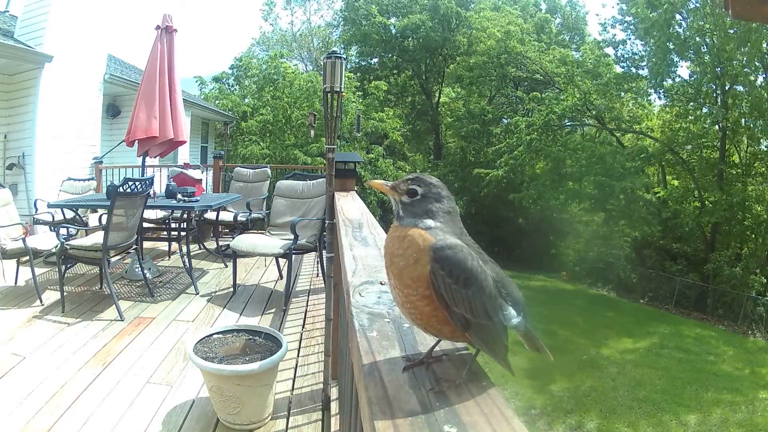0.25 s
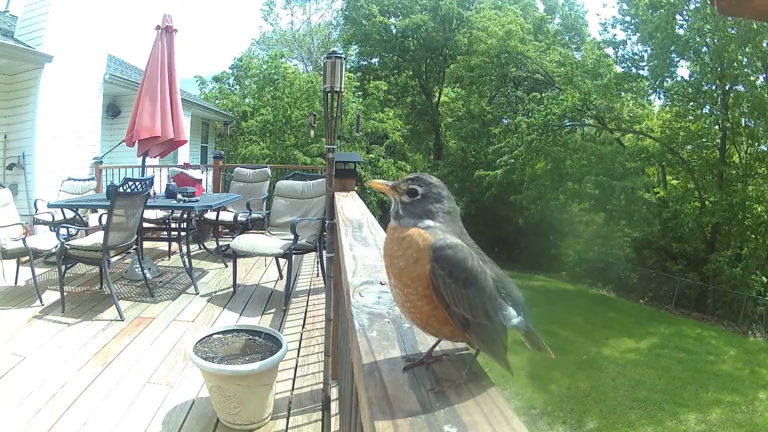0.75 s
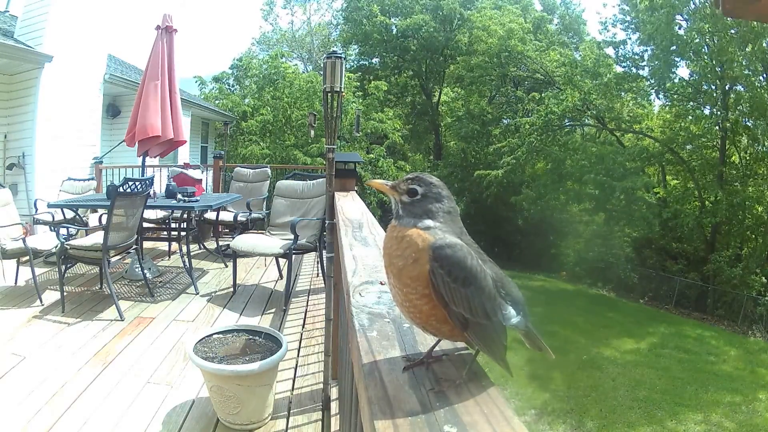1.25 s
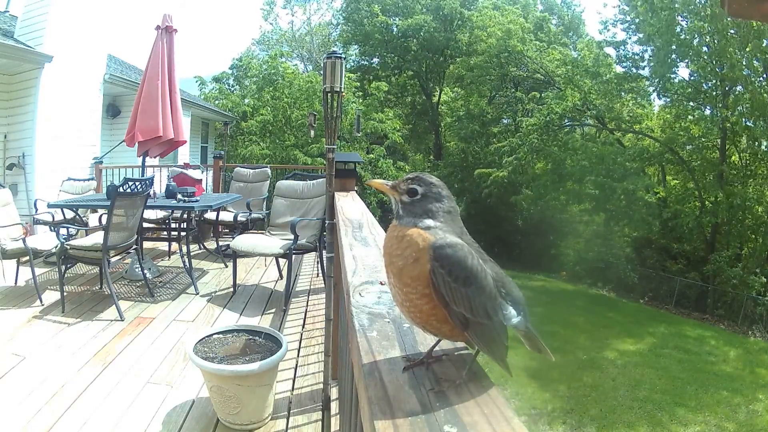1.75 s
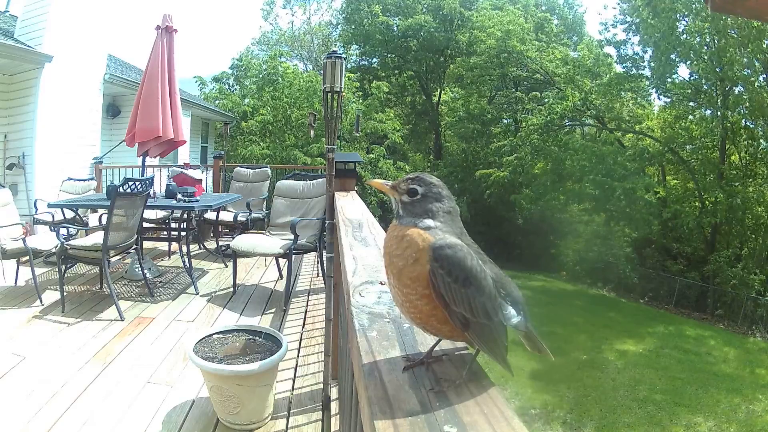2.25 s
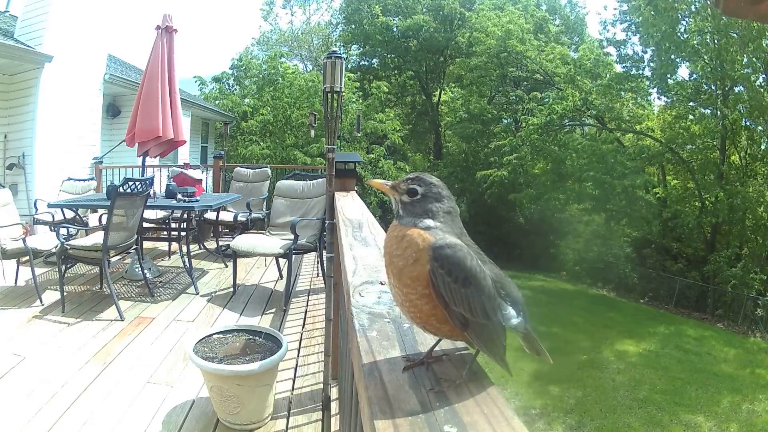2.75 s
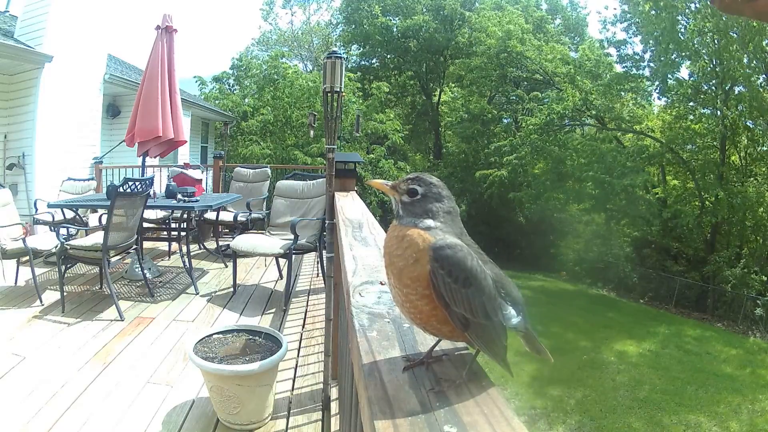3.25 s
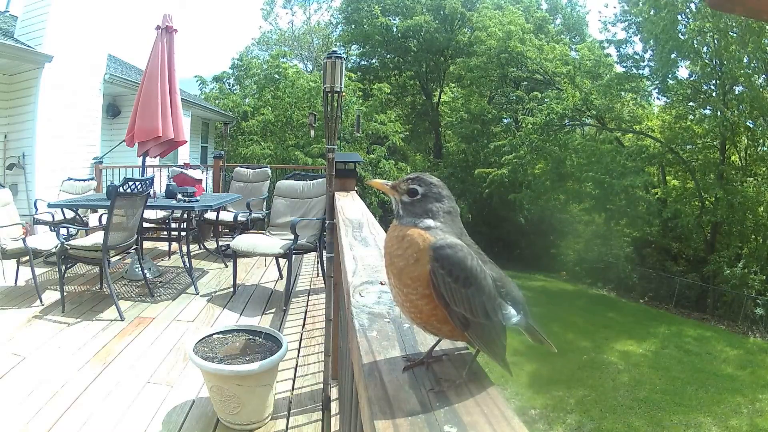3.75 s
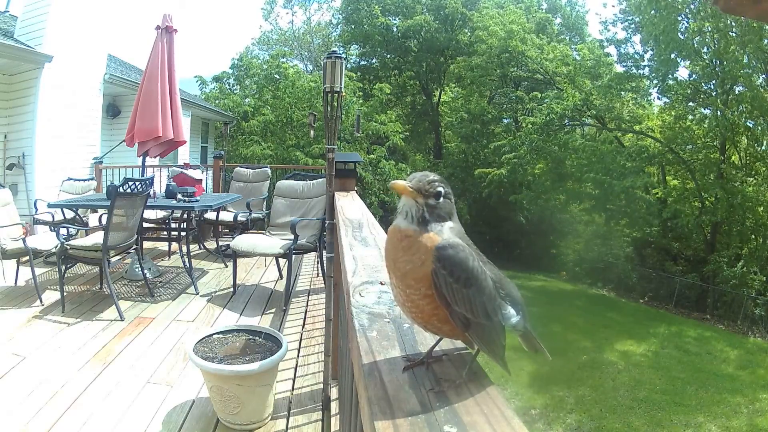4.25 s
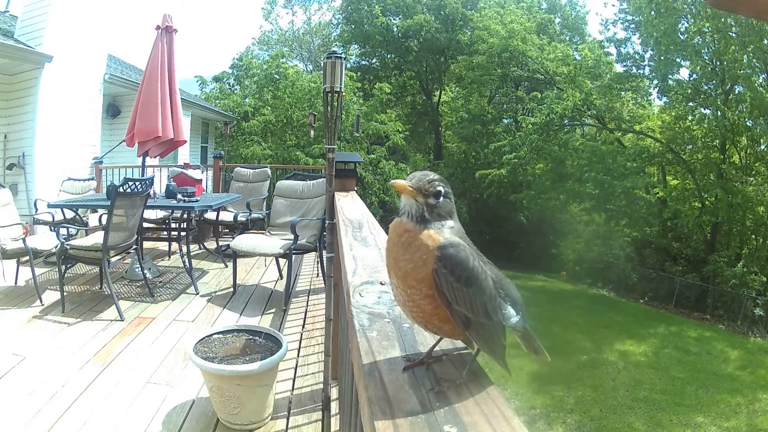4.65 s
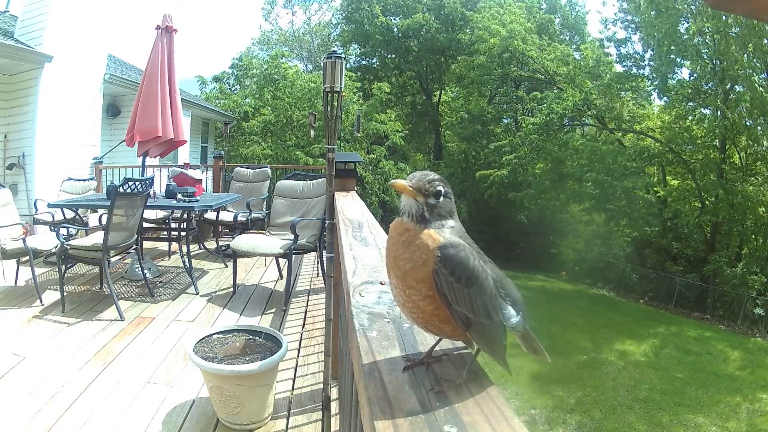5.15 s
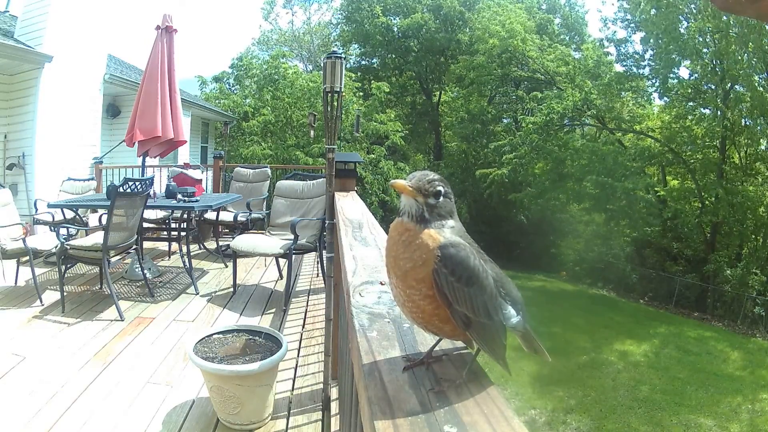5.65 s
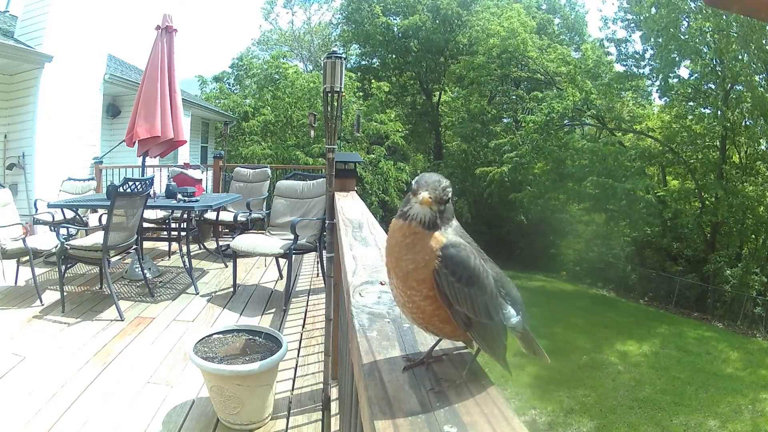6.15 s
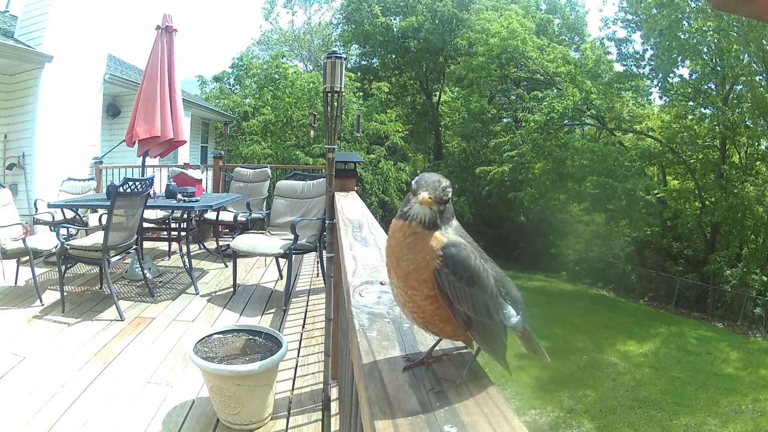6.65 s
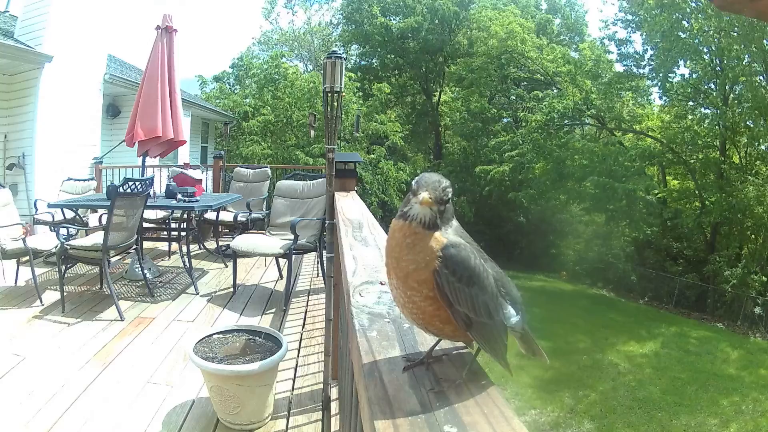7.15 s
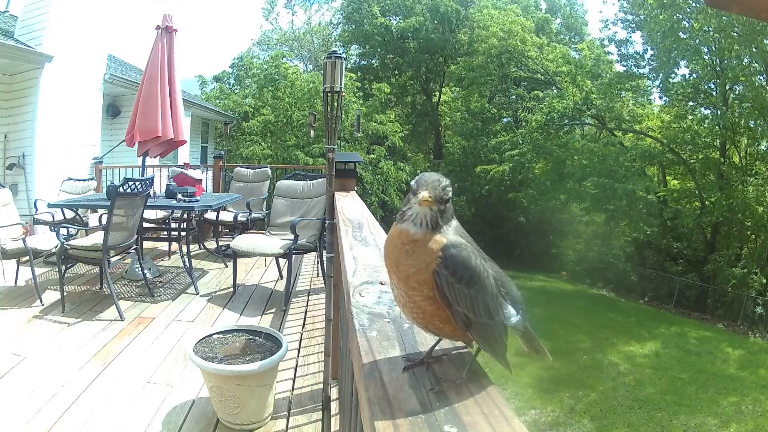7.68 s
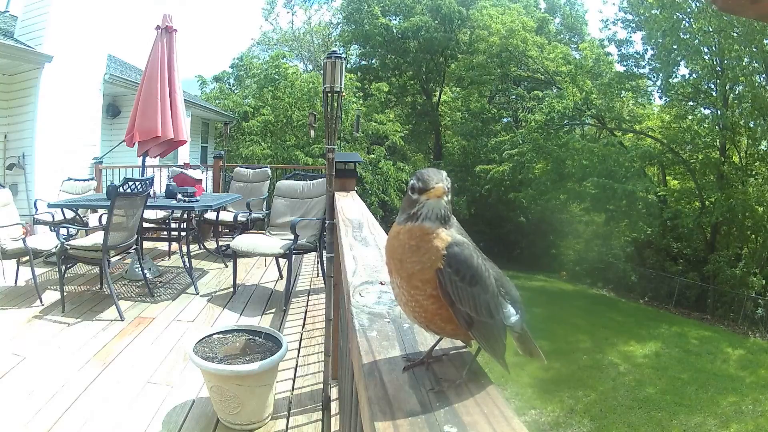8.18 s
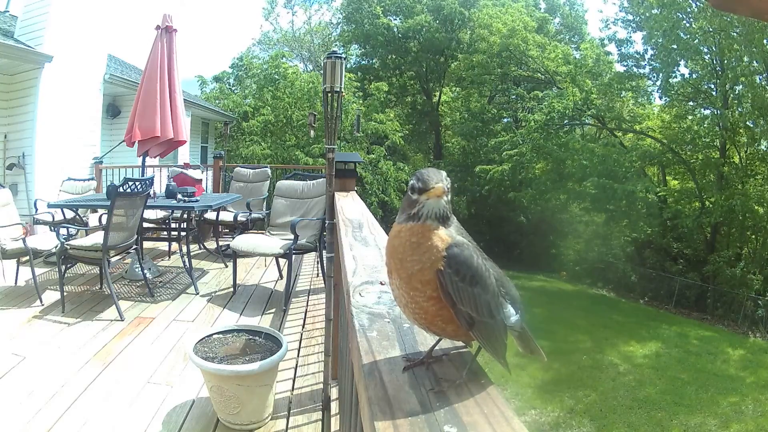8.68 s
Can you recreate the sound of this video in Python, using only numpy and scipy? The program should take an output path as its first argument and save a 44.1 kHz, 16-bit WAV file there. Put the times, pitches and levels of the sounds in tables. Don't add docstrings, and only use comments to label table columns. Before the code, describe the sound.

A quiet backyard heard through a small outdoor camera microphone, about nine seconds. A neighbouring air conditioner drones throughout: a low buzz around 250 and 500 Hz, throbbing rapidly, with soft rushing air. A robin a few metres away gives brief chirps, each about 0.05 to 0.08 seconds, sharp and slightly rough, two whistles sweeping steeply down together, with a short scatter off deck and wall. The first three come at 0.4, 0.7 and 1.0 seconds, the next, stronger, at 3.9, 4.2 and 4.4, with a very faint tail note at 4.5, and the last at 7.6, 7.8 and 8.0. Deep wind buffets thump the microphone from 0.5 to 1.7 and 2.0 to 2.9 seconds, then weaker flutters until about 5; afterwards it is calm. Far engines hum faintly at the start and intermittently after 5.4. Faint hiss and a barely audible high whine persist.

```python
import sys
import numpy as np
from scipy import signal
from scipy.fft import rfft, irfft
from scipy.io import wavfile
from scipy.ndimage import uniform_filter1d

SR = 44100
rng = np.random.default_rng(int(sys.argv[2]) if len(sys.argv) > 2 else 0)


def makeup_ratio(level_db):
    decades = np.asarray(level_db, float) / 20
    return 10 ** decades


def unload_wav(signal):
    wavfile.write(
        sys.argv[1],
        SR,
        np.round(np.clip(np.atleast_2d(signal).T, -1, 1) * 32767).astype(np.int16),
    )


N = 393372

# (start t/s, top t/s, stop t/s, top f/Hz, last f/Hz)
LOW_CALLS = [
    (.374, .385, .421, 1856, 960),
    (.681, .691, .732, 1884, 998),
    (.978, .985, 1.025, 1844, 914),
    (3.938, 3.949, 3.984, 1759, 1086),
    (4.18, 4.191, 4.232, 1855, 1087),
    (4.413, 4.421, 4.457, 2043, 1620),
    (7.57, 7.583, 7.62, 1886, 966),
    (7.831, 7.843, 7.883, 1826, 1010),
    (8.037, 8.045, 8.092, 2350, 1135),
    (4.489, 4.4895, 4.508, 1950, 1420),
]
# (start t/s, top t/s, stop t/s, top f/Hz, trough f/Hz)
HIGH_CALLS = [(.374, .387, .447, 2940, 1429), (.682, .695, .733, 3190, 1450),
              (.977, .989, 1.05, 3085, 1841), (3.938, 3.951, 4.008, 2953, 1367),
              (4.18, 4.193, 4.25, 3066, 1406), (4.41, 4.426, 4.477, 3220, 2180),
              (7.568, 7.586, 7.637, 3050, 1306), (7.83, 7.847, 7.891, 3170, 1453),
              (8.04, 8.05, 8.087, 3242, 2249)]
# (level/dB, swell level/dB, bend of the fall [exponent], even sag [share 0-1])
LOW_EFFORT = [(-38.5, 4, 2.4, .18), (-38.5, 4, 2.2, .11), (-40, 4, 5.5, .43), (-38, 3, 1.65, .1),
              (-34.8, 4, 2.7, .4), (-34.6, 8, 11, .62), (-34.2, 8, 1.9, .01), (-35.3, 7, 3.2, .22),
              (-35.3, 9, 8.5, .42), (-47.5, .1, .2, .05)]
# (level/dB, bend [exponent], sag [share 0-1], fall t/s, hook after the trough [factor])
HIGH_EFFORT = [(-40.5, 1.97, .27, .039, 1.01), (-40.5, 1.8, .25, .042, .01), (-41, 1.75, .15, .041, .01),
               (-37.5, 1.8, .17, .0435, .4), (-37.5, 1.6, .36, .048, .9), (-36.5, 4.3, .26, .051, .01),
               (-35.5, 1.5, .28, .041, .01), (-35, 2.05, .18, .04, .01), (-40.5, 4, .01, .035, .01)]
# (f/Hz, level/dB)
BEAK = [(1120, 5), (1330, 8.7), (1450, 6.2), (1560, 2.8), (1850, .1), (2200, -2.5), (2850, -6.5),
        (3200, -12)]
# (times high, times low, power of high, power of low, level/dB, flutter level/dB)
COUPLING = [
    (1, -1, .5, .5, 0, 1),
    (0, 2, 0, 1.5, -1.5, 4),
    (1, 1, 1, 1, 19, 8),
    (-1, 3, .5, .5, -13, 3),
]
# (f/Hz, level/dB)
THROAT = [(650, -20), (850, -9.5), (1050, -2.2), (1450, 0.5), (2300, -4), (2750, -16), (3300, -10.5),
          (3750, -12.5), (4150, -22), (4500, -42)]
# (order, line level/dB, one shaft turn below level/dB, one above level/dB,
# two below level/dB, two above level/dB)
BUZZ = [(1, -79, -110, -65, -110, -78), (2, -53, -60, -65, -86, -75), (3, -72, -79, -74, -75, -91),
        (4, -72, -72, -67, -87, -84), (5, -64, -72, -72, -83, -77), (6, -79, -71, -77, -92, -87),
        (7, -92, -77, -70, -76, -89), (8, -84, -88, -76, -86, -84), (9, -83, -84, -83, -91, -89),
        (10, -88, -85, -79, -89, -89), (11, -77, -80, -83, -87, -86), (12, -86, -87, -91, -87, -93),
        (13, -90, -91, -93, -101, -97), (14, -91, -94, -93, -101, -92), (15, -89, -89, -96, -94, -105),
        (16, -91, -94, -91, -95, -86), (17, -90, -95, -93, -100, -91), (18, -93, -94, -94, -90, -90),
        (19, -91, -96, -105, -89, -100)]
CLEAR_LINES = [(2, 0), (7, 1), (11, 0)]
# (middle t/s, length t/s, level/dB)
LINE_SWELLS = [
    [(2.2, 1.6, -2.5), (6.5, 6, 1.2)],
    [(.05, .9, 6), (4.7, 3, 3.5), (7.4, 2.1, -5)],
    [(3.1, 2.1, 5), (7.4, 3.5, -8)],
]
# (order of the blade rate, level/dB)
FAN = [(2, -71), (3, -61), (4, -74), (5, -74), (7, -75), (9, -75), (11, -83), (13, -87)]
# (f/Hz, level/dB)
LONE_LINES = [(289.73, -60), (447.5, -67), (5728, -92)]
# (f/Hz, level/dB per Hz)
AIR = [(40, -79.5), (100, -79), (200, -82), (450, -84.5), (1250, -86), (2200, -99), (2850, -99),
       (3400, -106), (4250, -102), (5400, -111), (6200, -107), (7500, -114), (9000, -122), (10500, -118)]
# (t/s, level/dB)
BREEZE = [(0, -60), (.45, -54), (1.55, -56), (1.85, -62), (2.3, -50), (2.65, -50), (2.78, -67), (3.1, -60),
          (3.6, -65), (4.33, -67), (4.5, -59), (5.1, -65), (5.6, -74)]
# (t/s, deep rumble level/dB, upper flutter level/dB, held t/s)
GUSTS = [(.08, -60, -54, .1), (.31, -53, -57, .05), (.49, -32, -35, .03), (.61, -37, -42, .01),
         (.72, -37, -43, .02), (.81, -45, -41, .03), (.95, -44, -47, .04), (1.14, -47, -44, .01),
         (1.3, -41, -46, .03), (1.36, -42, -40, .01), (1.42, -47, -48, .01), (1.57, -46, -48, .01),
         (1.73, -55, -52, .03), (2.065, -33, -34, .04), (2.15, -36, -39, .025), (2.28, -47, -38.5, .01),
         (2.35, -42, -50, .01), (2.42, -39, -48, .03), (2.51, -45, -54, .03), (2.61, -43.5, -54, .03),
         (2.84, -35, -50, .01), (2.92, -46, -45, .07), (3.3, -51, -55, .06), (3.68, -56, -61, .03),
         (4.02, -54, -65, .03), (4.41, -50, -59, .05), (4.52, -50, -51, .01), (4.59, -46, -60, .03),
         (4.77, -54, -59, .03), (4.92, -56, -55, .04)]
# (step of the sideband comb, level/dB)
WHINE = [(-3, -108), (-2, -104), (-1, -99), (0, -91), (1, -91), (2, -100), (3, -105), (4, -106)]
# (from t/s, to t/s, f/Hz, level/dB)
ENGINES = [(0, 0.357, 124.6, -54), (0, .12, 158, -53), (5.4, 5.95, 94.4, -68), (6.05, 7.15, 151.3, -65),
           (7.699, 8.1, 97.5, -60), (7.703, 8.3, 152.2, -65), (8.4, 8.926, 96.3, -58)]

LOW_RISE_HZ_PER_MS2, HIGH_RISE_HZ_PER_MS2 = 2.7, 4.5
ATTACK_S, RELEASE_S, EDGE_DB = .004, .004, 16
SWELL_S, HIGH_SWELL_DB = .022, 4.5
TIRE_AT, TIRE_DB, TIRE_S = .88, 12, .009
OVERTONE_DB, OVERTONE_HZ = -38, 12100
DECK_DB, DECK_T60_S = -19.5, .09
WALL_S, WALL_DB = .023, -25
BUZZ_HZ, SHAFT_HZ, BLADE_HZ = 249.03, 57.95, 156.62
SHAKE_LAG_RAD = .65
GUST_RISE_DB_PER_S, GUST_FALL_DB_PER_S = 550, 330
WHINE_HZ, WHINE_STEP_HZ = 13080.5, 81
HISS_DB = -117


def walk(rate):
    k = int(SR / rate)
    steps = np.repeat(rng.standard_normal(N // k + 1), k)
    return 0.8 * uniform_filter1d(uniform_filter1d(steps, k), k)[:N]


def band(x, lo_hz, hi_hz):
    return signal.sosfilt(signal.butter(2, [lo_hz, hi_hz], "band", fs=SR, output="sos"), x)


def robin():
    high_hz, high_size = voice(HIGH_CALLS, HIGH_EFFORT, HIGH_RISE_HZ_PER_MS2, high_fall)
    low_hz, low_size = voice(LOW_CALLS, LOW_EFFORT, LOW_RISE_HZ_PER_MS2, low_fall)
    high, low = 2 * np.pi * np.cumsum([high_hz, low_hz], axis=1) / SR
    song = high_size * np.sin(high) + low_size * np.sin(low)
    for m, n, p, q, db, flutter_db in COUPLING:
        throat_db = np.interp(m * high_hz + n * low_hz, *np.transpose(THROAT))
        size = makeup_ratio(db + throat_db) * high_size ** p * low_size ** q
        song += size * makeup_ratio(flutter_db * walk(250)) * np.sin(m * high + n * low)
    song += overtones(low, low_hz, low_size, high_size)
    return song + wall_echo(song) + deck_echo(song)


def voice(calls, efforts, rise, fall):
    hz, size = np.ones(N), np.zeros(N)
    for (start, top, stop, top_hz, end_hz), (db, *shape) in zip(calls, efforts):
        i = np.arange(int(start * SR) - 200, int(stop * SR) + 200)
        t = np.clip(i / SR, start, stop)
        ms = (t - top) * 1000
        share, swell_db, tired_db = fall(np.maximum(ms, 0), (stop - top) * 1000, *shape)
        hz[i] = top_hz - rise * np.minimum(ms, 0) ** 2 - (top_hz - end_hz) * share
        attack = np.maximum(1 - (t - start) / ATTACK_S, 0)
        release = np.maximum(1 - (stop - t) / RELEASE_S, 0)
        swell = np.maximum(1 - (t - start) / SWELL_S, 0)
        breath_db = db - EDGE_DB * (attack + release) - swell_db * swell - tired_db
        beak_db = np.interp(hz[i], *np.transpose(BEAK))
        size[i] = makeup_ratio(breath_db + beak_db) * (t == i / SR)
    size = np.sqrt(2) * abs(uniform_filter1d(size, int(.0013 * SR)))
    return hz, size * makeup_ratio(1.2 * walk(270))


def high_fall(ms, span_ms, bend, sag, fall_s, hook):
    u = ms / 1000 / fall_s
    swing = sag * u + (1 - sag) * np.sin(np.pi / 2 * u ** bend) ** 2
    hooked = 1 - (hook * (u - 1)) ** 2
    tired_db = TIRE_DB * (1 - np.exp(-np.maximum(u - TIRE_AT, 0) * fall_s / TIRE_S))
    return np.where(u > 1, hooked, swing), HIGH_SWELL_DB, tired_db


def low_fall(ms, span_ms, swell_db, bend, sag):
    u = ms / span_ms
    return sag * u + (1 - sag) * u ** bend, swell_db, 0


def overtones(low, low_hz, low_size, high_size):
    comb = sum(np.sin(k * low) * walk(1200) for k in range(5, 13))
    comb *= makeup_ratio(OVERTONE_DB) * low_size ** .7 * high_size ** .4 * (low_hz / 1500) ** 2
    resonant = band(comb, OVERTONE_HZ - 1100, OVERTONE_HZ + 1100)
    return resonant + makeup_ratio(-2) * band(comb, 5000, 13000)


def wall_echo(song):
    return makeup_ratio(WALL_DB) * np.roll(band(song, 610, 2500), int(WALL_S * SR))


def deck_echo(song):
    t = np.arange(SR // 4) / SR
    echo = rng.standard_normal(len(t)) * makeup_ratio(-60 * t / DECK_T60_S) * (t > .006)
    return makeup_ratio(DECK_DB) * signal.fftconvolve(song, echo / np.linalg.norm(echo))[:N]


def air_conditioner():
    buzz = {}
    for order, *levels in BUZZ:
        for turn, db in zip((0, -1, 1, -2, 2), levels):
            if db > -100:
                phase = order ** 2 + SHAKE_LAG_RAD * turn ** 2
                buzz[order, turn] = (order * BUZZ_HZ + turn * SHAFT_HZ, db, phase)
    t = np.arange(N) / SR
    clear = 0
    for line, swells in zip(CLEAR_LINES, LINE_SWELLS):
        hz, db, phase = buzz.pop(tuple(line))
        for middle, length, lift_db in swells:
            db = db + lift_db * np.exp(-(2 * (t - middle) / length) ** 2)
        clear = clear + makeup_ratio(db) * np.sqrt(2) * np.sin(2 * np.pi * hz * t + phase)
    fan = [(k * BLADE_HZ, db, 0) for k, db in FAN]
    lone = [(hz, db, 0) for hz, db in LONE_LINES]
    return clear + makeup_ratio(.5) * tones(list(buzz.values()) + fan + lone)


def tones(lines):
    t, slow = np.arange(N) / SR, np.arange(0, N / SR + 1, .7)
    out = np.zeros(N)
    for hz, db, phase in lines:
        chance_db = min(hz / 550, 3) * rng.standard_normal(len(slow))
        swell = np.interp(t, slow, makeup_ratio(chance_db))
        out += makeup_ratio(db) * swell * np.sin(2 * np.pi * hz * t + phase)
    return out * np.sqrt(2)


def air():
    hz = np.fft.rfftfreq(N, 1 / SR)
    at_hz, db = np.transpose(AIR)
    rush = makeup_ratio(np.interp(np.log(hz + 1), np.log(at_hz), db, right=-130))
    rush *= np.clip(hz / 30, 0, 1) ** 2
    colour = np.hypot(rush, makeup_ratio(HISS_DB)) * np.sqrt(SR / 2)
    noise = irfft(rfft(rng.standard_normal(N)) * colour, N)
    return noise * makeup_ratio(0.13 * walk(1.65) + 0.72 * walk(12))


def wind():
    t, out = np.arange(N) / SR, 0
    breeze = makeup_ratio(np.interp(t, *np.transpose(BREEZE)))
    for k, (lo_hz, hi_hz, breeze_db) in enumerate([(33, 78, .1), (60, 150, -3)]):
        eddies = band(band(rng.standard_normal(N), lo_hz, hi_hz), lo_hz, hi_hz)
        eddies /= np.sqrt(uniform_filter1d(eddies ** 2, int(1.5 * SR / lo_hz)) + 0.17 * eddies.var())
        push = breeze * makeup_ratio(breeze_db + 3 * walk(15))
        for s, *db, held in GUSTS:
            i = slice(max(int((s - .2) * SR), 0), int((s + .4) * SR))
            rise_db = GUST_RISE_DB_PER_S * (s - t[i])
            fall_db = GUST_FALL_DB_PER_S * (t[i] - s - held)
            fade_db = np.maximum(np.maximum(rise_db, fall_db), 0)
            push[i] = np.hypot(push[i], makeup_ratio(db[k] - fade_db))
        out = out + eddies * push
    return out


def whine():
    t = np.arange(N) / SR
    drift = 2 * np.pi * np.cumsum(2.5 * walk(4)) / SR
    out = np.zeros(N)
    for k, db in WHINE:
        hz = WHINE_HZ + k * WHINE_STEP_HZ
        out += makeup_ratio(db) * np.sqrt(2) * np.sin(2 * np.pi * hz * t + drift + k * k)
    return out


def traffic():
    t, out = np.arange(N) / SR, 0
    for start, end, hz, db in ENGINES:
        gate = np.clip(np.minimum(t - start + .04, end - t + .04) / 0.12, 0, 1)
        phase = 2 * np.pi * np.cumsum(hz * (1 + 0.0149 * walk(12))) / SR
        out = out + makeup_ratio(db + 2.5 * walk(14)) * np.sqrt(2) * gate * np.sin(phase)
    return out


def scene():
    return (robin() + air_conditioner() + air() + wind() + whine() + traffic())[None]


def low_pass(x):
    return signal.sosfilt(signal.butter(12, 15710, fs=SR, output="sos"), x)


def record(dry):
    bass = signal.butter(2, 17, "high", fs=SR, output="sos")
    top = signal.ellip(10, .2, 60, 15650, fs=SR, output="sos")
    mix = signal.sosfilt(np.vstack([bass, top]), dry)
    return low_pass(mix)


dry = scene()
out = record(dry)
unload_wav(out)
```